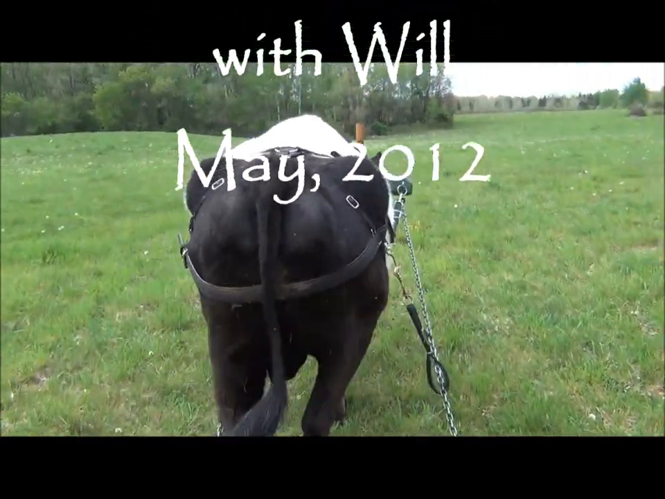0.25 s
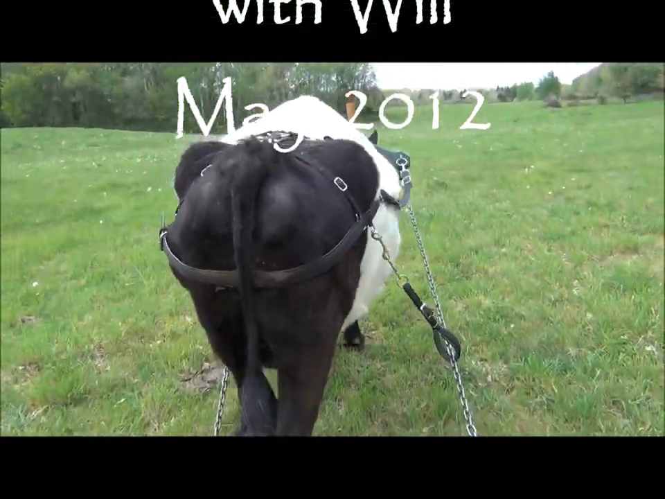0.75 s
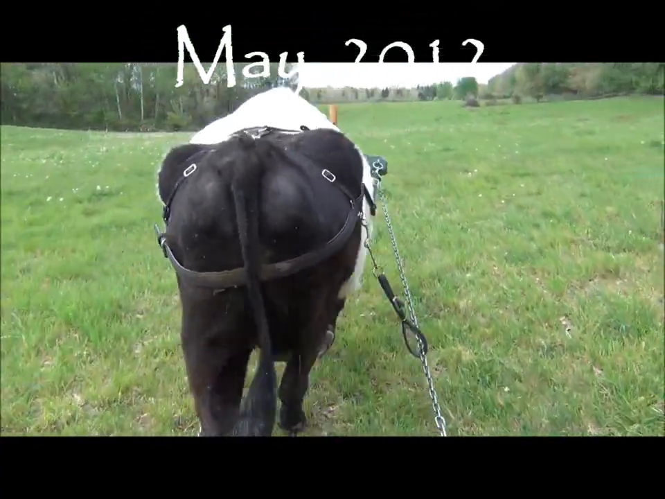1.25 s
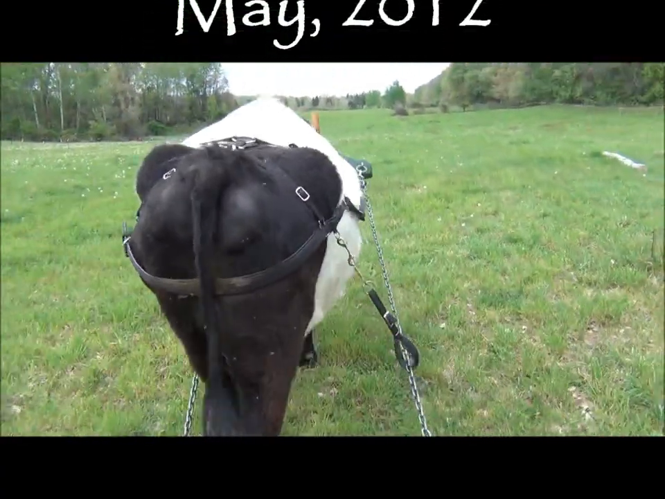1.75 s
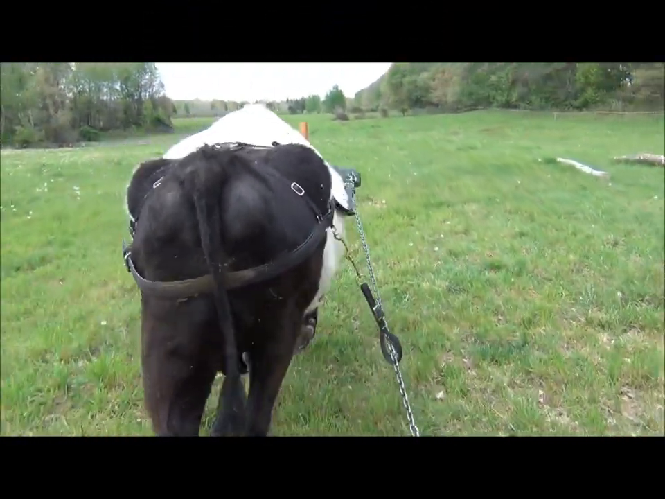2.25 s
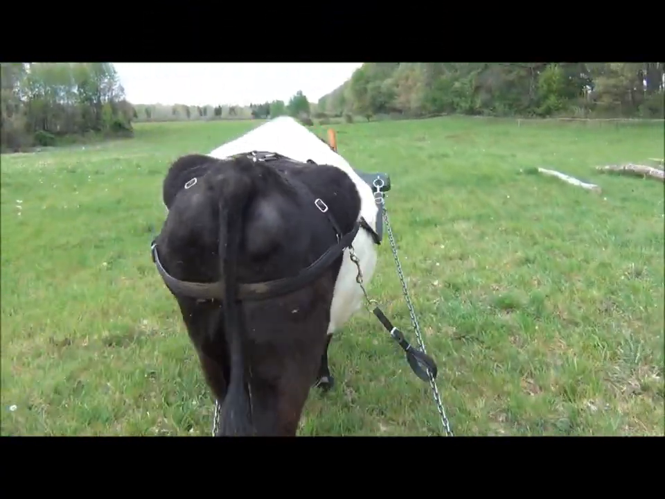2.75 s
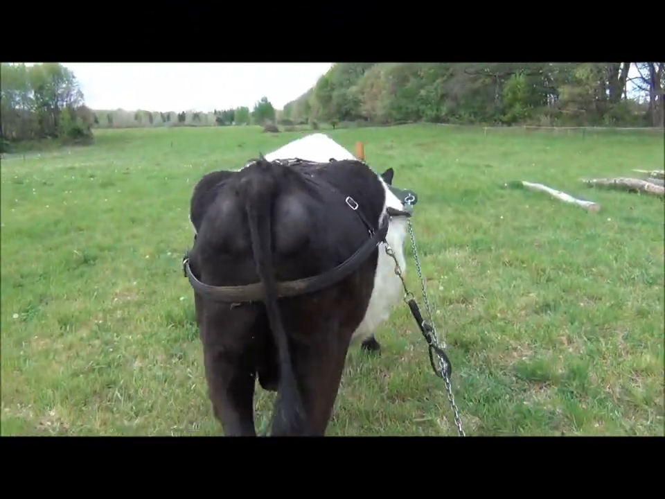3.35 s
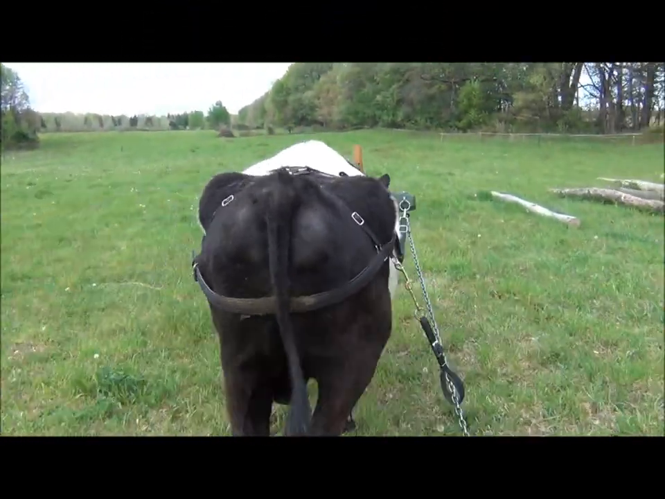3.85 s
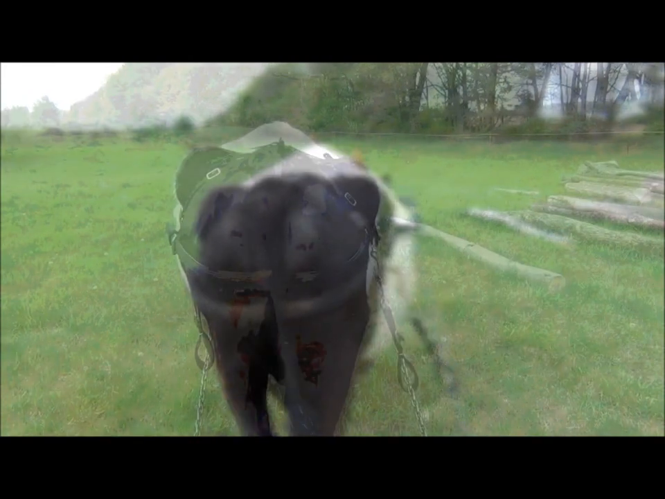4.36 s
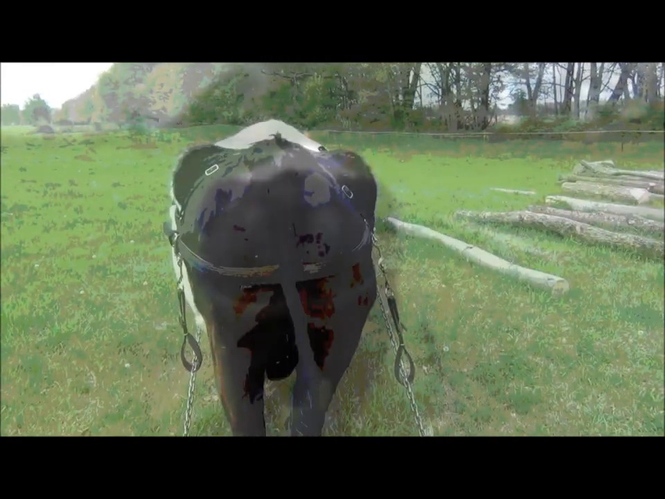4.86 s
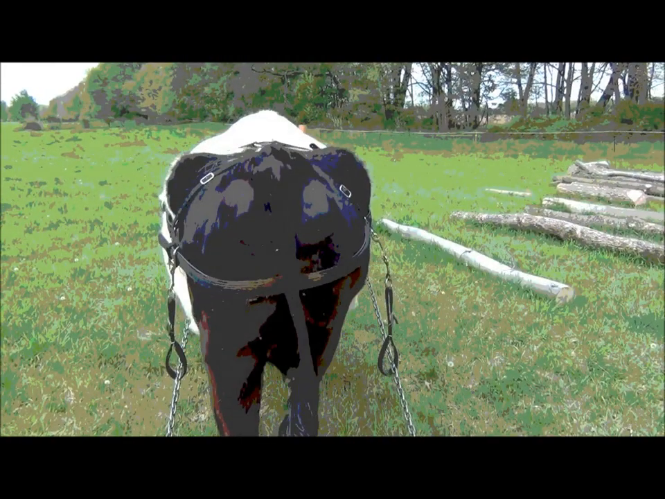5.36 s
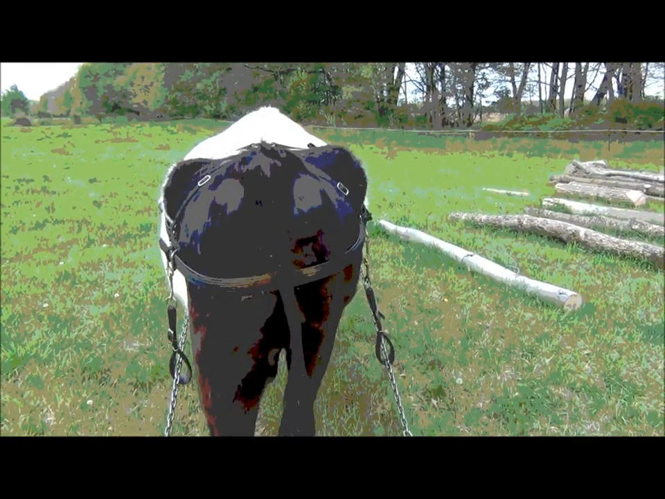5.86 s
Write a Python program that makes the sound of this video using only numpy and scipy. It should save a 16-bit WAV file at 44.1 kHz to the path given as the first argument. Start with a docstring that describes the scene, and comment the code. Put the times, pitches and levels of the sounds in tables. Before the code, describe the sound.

Slow hoof thuds crunch on turf with grassy swishes, close trace chains clinking and jingling sharply, light wind thumping the microphone, then an abrupt cut.

```python
"""An ox in harness walks over a meadow, about two steps a second, heard from close behind.
Each step is a heel and toe thud of crunching turf, then a noise swish as a leg swings through the grass.
Trace chains clink in short dying modes and set a steel ring singing very high; wooden gear clacks in bursts.
The load drags, bumps and jolts behind, dry stalks snap, and a little low wind rumbles and thumps.
A limiter ducks everything at the loudest moments, and the sound is cut off at the end."""
import sys
import numpy as np
from scipy import signal
from scipy.fft import rfft, irfft, next_fast_len
from scipy.io import wavfile
from scipy.ndimage import uniform_filter1d

SR = 44100
rng = np.random.default_rng(int(sys.argv[2]) if len(sys.argv) > 2 else 0)


def wrap_up_sound(samples):
    """Save the sound to the file named by the first command line argument, as 16-bit audio."""
    columns = np.atleast_2d(samples).T
    # keep every value between -1 and 1, then stretch to whole-number steps
    tamed = np.clip(columns, -1, 1)
    steps = np.round(tamed * 32767).astype(np.int16)
    wavfile.write(sys.argv[1], SR, steps)


N = 269892
TIME = np.arange(N) / SR
END_S = 5.484  # the sound is cut here


def amp(db):
    """Decibels to gain."""
    return 10 ** (np.asarray(db) / 20)


def unit(x):
    """Scales to rms 1."""
    return x / np.sqrt(np.mean(x ** 2) + 1e-20)


def add(mix, s, sound):
    """Puts a sound into the mix at time s, in seconds."""
    part = mix[round(s * SR):][:len(sound)]
    part += sound[:len(part)]


def shape(x, points):
    """Filters x by a curve of (Hz, dB) points."""
    hz, db = np.transpose(points)
    size = next_fast_len(len(x))
    f = np.fft.rfftfreq(size, 1 / SR)
    gain = amp(np.interp(np.log(f + 1), np.log(hz), db))
    return irfft(rfft(x, size) * gain, size)[:len(x)]


def colour(x, points):
    """Filters x by a curve of (Hz, dB) points and scales it to rms 1."""
    return unit(shape(x, points))


def focus(x, hz, octaves, depth_db):
    """Lifts a broad hump around hz, at rms 1."""
    f = np.fft.rfftfreq(len(x), 1 / SR) + 1
    hump = np.exp(-(np.log2(f / hz) / octaves) ** 2)
    return unit(irfft(rfft(x) * amp(depth_db * hump), len(x)))


def wander(per_s):
    """A random curve of rms 1, drawn through per_s points a second."""
    return unit(np.interp(TIME * per_s, np.arange(N), rng.standard_normal(N)))


def crackle(per_s, spread_db):
    """Clicks at random moments, uneven in size by spread_db, at rms 1."""
    size = amp(spread_db * np.minimum(rng.exponential(1, N), 4.5))
    happens = rng.random(N) < per_s / SR
    return unit(size * rng.choice([-1, 1], N) * happens)


def ring(modes, scatter_db, detune):
    """Dying modes, each with a random strength, tuning and phase; scaled to start at rms 1."""
    hz, db, t60 = np.transpose(modes)[:, :, None]
    strength, tune, phase = rng.standard_normal((3, len(hz), 1))
    t = np.arange(SR // 2) / SR
    size = amp(db + scatter_db * strength)
    tones = np.sin(2 * np.pi * (hz * (1 + detune * tune) * t + phase))
    waves = size * amp(-60 * t / t60) * tones
    return waves.sum(0) / np.sqrt(np.sum(size ** 2) / 2)


def puff(rise_s, t60):
    """White noise, and apart from it an envelope that swells and dies away."""
    t = np.arange(SR // 2) / SR
    envelope = (1 - np.exp(-t / rise_s)) * amp(-60 * t / t60)
    return rng.standard_normal(len(t)), envelope


def chatter(body, count, within_s):
    """Shares a blow between a first contact and a few weaker ones in quick succession."""
    out = body.copy()
    for delay, strength in rng.random((count, 2)):
        add(out, delay * within_s, body * strength * (1 - delay / 2))
    return out * np.std(body) / np.std(out)


def swing(hz):
    """A damped push of about two cycles, with a peak near 1."""
    cycles = np.arange(SR // 2) / SR * hz
    age = cycles / 0.47
    return age * np.exp(1 - age) * np.sin(2 * np.pi * cycles)


# Spectrum of crunching turf. Each row: frequency in Hz, relative level in dB.
TURF_SPECTRUM = [(40, -3), (140, 0.5), (280, 9), (520, 6), (1000, 3.5), (1700, 2), (3500, -10), (9000, -30)]


def thud(hz, depth_db):
    """A knock at hz, and turf that crunches in separate crumbs under it."""
    soil, blow = puff(rise_s=0.00042, t60=0.16)
    crumbs = crackle(per_s=700, spread_db=2.5)[:len(soil)] + .4 * soil
    crunch = focus(colour(crumbs, TURF_SPECTRUM), hz, octaves=0.42, depth_db=depth_db) * blow
    return unit(crunch) * np.std(blow) + swing(hz)


# The walk. Each row: heel landing in seconds, relative thud level in dB, thud pitch in Hz,
# toe delay after the heel in seconds, leg swish delay after the heel in seconds, swish level in dB.
STEPS = [(0.704, -21, 690, 0.0082, 0.08, -20.5), (1.141, -17, 510, 0.042, .065, -21.5),
         (1.602, -15.5, 520, .006, 0.072, -21.5), (2.074, -19.5, 520, 0.033, 0.076, -32),
         (2.531, -29.5, 480, 0.035, 0.097, -22), (2.985, -15, 480, 0.033, 0.14, -17),
         (3.377, -17.5, 1270, 0.036, 0.23, -26.5), (3.888, -20, 320, .02, 0.2, -26.5),
         (4.289, -15, 300, 0.058, 0.17, -22), (4.834, -18.5, 431, 0.06, 0.082, -23),
         (5.289, -16, 460, .01, .17, -22)]
# The load knocks on the ground. Each row: start in seconds, relative level in dB, pitch in Hz.
LOAD_BUMPS = [(0.406, -28, 720), (1.983, -24.5, 288), (2.753, -22.5, 460.6), (4.373, -17, 520),
              (5.119, -17, 497)]
TOE_DB = -2.5  # the toe lands more softly than the heel


def thuds():
    """Each hoof lands heel first, then toe; the load knocks with a hollower, more pitched note."""
    out = np.zeros(N)
    for s, level_db, hz, toe_s, _, _ in STEPS:
        add(out, s, amp(level_db) * thud(hz, depth_db=4))
        add(out, s + toe_s, amp(level_db + TOE_DB) * thud(hz, depth_db=3.0))
    for s, level_db, hz in LOAD_BUMPS:
        add(out, s, amp(level_db) * thud(hz, depth_db=15.5))
    return amp(-3.5) * out


# Steady hiss of grass under the load. Each row: time in seconds, relative level in dB.
DRAG_LEVEL = [(0.0, -25.5), (0.42, -32), (0.88, -28.5), (1.3, -30), (2.98, -28.5), (3.27, -26),
              (3.89, -29.5), (4.43, -28.5), (5.25, -31.5)]
SWISH_S = 0.042  # half length of a leg's swish


def grass_db():
    """Level of the grass: the steady drag, and one swell in every step as a leg swings through."""
    power = amp(np.interp(TIME, *np.transpose(DRAG_LEVEL)) + 2.5) ** 2
    for s, _, _, _, swing_s, swish_db in STEPS:
        swell = np.exp(-((TIME - s - swing_s) / SWISH_S) ** 2)
        power = power + amp(swish_db) ** 2 * swell
    return 10 * np.log10(power)


# Spectrum of flicking grass blades. Each row: frequency in Hz, relative level in dB.
GRASS_SPECTRUM = [(710, -21), (1200, -10), (1520, -3.5), (1750, -8.5), (3490, -4.5), (5320, -2.5),
                  (6250, -2), (9420, 4), (12700, 4), (15800, -4.5)]
# Spectrum of the scraped ground. Each row: frequency in Hz, relative level in dB.
GROUND_SPECTRUM = [(30, -8.5), (110, -9), (300, -1.5), (550, -4), (900, -7), (1600, -8), (3000, -12.5),
                   (6000, -19.5), (15000, -23)]


def meadow():
    """Blades of grass flick past in clumps; the duller scrape of the ground follows more weakly."""
    swish_db = grass_db()
    blades = colour(crackle(per_s=4400, spread_db=-1.5) + 0.89 * rng.standard_normal(N), GRASS_SPECTRUM)
    clumps_db = 1.38 * wander(per_s=50) + 1.0 * wander(per_s=450)
    swish = blades * amp(swish_db + clumps_db - 0.62)

    crumbs = colour(crackle(per_s=700, spread_db=1.5) + 0.87 * rng.standard_normal(N), GROUND_SPECTRUM)
    ground_db = np.interp(TIME, [0, END_S], [-36, -33])  # the ground grows rougher along the way
    follow_db = 0.074 * (swish_db - swish_db.mean())
    return swish + crumbs * amp(ground_db + follow_db + 2.0 * wander(per_s=47))


# Modes of a chain link. Each row: nominal frequency in Hz, relative level in dB, t60 in seconds.
LINK_MODES = [(1193, -14.5, 0.11), (2915, -14, 0.095), (4510, -11, 0.048), (5283, -5, 0.041),
              (5500, -2.5, 0.046), (6750, -5, 0.015), (6710, -2, 0.047), (7270, 6, 0.0086),
              (7930, -8, 0.065), (10220, 1.5, 0.021)]


def clink(hz):
    """A gritty, chattering contact and a short ring, choked by the neighbouring links."""
    own_mode = (hz, 3, .034)  # the struck link sings out above the rest of the chain
    body = ring([*LINK_MODES, own_mode], scatter_db=3, detune=.022)
    grit, contact = puff(rise_s=.0001, t60=0.042)
    grit = focus(grit, hz, octaves=0.32, depth_db=4.5) * contact
    return chatter(body, count=3, within_s=.006) + .4 * grit


# Chain links strike each other. Each row: start in seconds, level in dB, nominal pitch of the link in Hz.
CLINKS = [(0.053, -15.5, 7100), (0.2061, -12, 6750), (0.2362, -16, 6680), (0.2648, -13.5, 6600),
          (0.2753, -17.5, 6700), (0.3534, -16.5, 7540), (0.4115, -14, 6800), (0.6743, -16.5, 6600),
          (0.6864, -20, 6470), (0.7044, -8.5, 5500), (0.9634, -14, 7100), (1.068, -14.5, 6900),
          (1.2072, -14.5, 5400), (1.3592, -15, 6770), (1.6926, -15, 5270), (1.8592, -12.5, 7150),
          (1.9475, -16.5, 6900), (1.9965, -10.5, 6700), (2.013, -9, 6700), (2.056, -16, 6720),
          (2.152, -14, 6700), (2.18, -20, 5440), (2.761, -14, 7200), (3.0021, -14.5, 6740),
          (3.029, -20, 5260), (3.6481, -18, 5570), (3.6805, -13.5, 5590), (3.711, -13, 6860),
          (3.7379, -15, 5370), (4.1165, -12, 6950), (4.14, -16.5, 5300), (4.2806, -15.5, 7500),
          (4.3887, -14, 5200), (4.6719, -8, 5280), (4.8455, -15.5, 6710), (5.0698, -16, 6860),
          (5.2883, -13.5, 7150), (5.34, -11.5, 5120), (5.369, -15, 5120)]
# A hook swings against the chain. Each row: start in seconds, level in dB.
HOOK_HITS = [(4.982, -11.5)]
# Modes of the hook. Each row: frequency in Hz, relative level in dB, t60 in seconds.
HOOK_MODES = [(5060, -7.5, 0.13), (7670, -8, 0.053), (9280, 0, 0.038)]


def chains():
    """Links clink as the trace chains tighten and slacken; a hook swings against the chain."""
    out = np.zeros(N)
    for s, level_db, hz in CLINKS:
        add(out, s, amp(level_db) * clink(hz))
    hook = ring(HOOK_MODES, scatter_db=0, detune=0)
    for s, level_db in HOOK_HITS:
        add(out, s, amp(level_db) * hook)
    return out


# A steel ring is thrown. Each row: start in seconds, first blow's level in dB, bouncing time in seconds.
JINGLES = [(0.1835, -20, .005), (0.2139, -21, .05), (0.2761, -11, .13), (0.4945, -12.5, .008),
           (0.6893, -24, .03), (0.9707, -18, .004), (1.071, -19, .012), (1.1129, -19, .008),
           (1.1618, -26, .008), (1.208, -22.5, .07), (1.3925, -19.5, .005), (1.7489, -26, .003),
           (1.9505, -20.5, .008), (1.9969, -18.5, .01), (2.0178, -12.5, .045), (2.1006, -17, .008),
           (2.169, -14.5, .06), (3.03, -24, .08), (3.6506, -28, .09), (3.7504, -16, .004),
           (3.78, -22, .025), (4.144, -15, .03), (4.672, -9.5, .022), (4.9107, -26, .045),
           (5.0779, -21, .018), (5.3722, -24, .01), (5.4091, -25, .025)]
# Modes of the steel ring. Each row: nominal frequency in Hz, relative level in dB, t60 in seconds.
RING_MODES = [(14250, 3, .24), (14341, -0.5, .14), (14734, 2, .11), (14900, 2, .02), (15170, -4, .27),
              (15402, -2, .17)]
BOUNCE_S, BOUNCE_DB = 0.013, -1  # mean gap between bounces, their level against the first blow
CHOKE_S = 0.008  # time constant with which a new bounce stops the note before it
REST_S = .1  # the ring comes to rest against the leather, which damps its last note
FLUTTER_DB = 1.3  # rms flutter of the level as the ring turns


def jingles():
    """A steel ring bounces unevenly; each bounce chokes the last note and favours modes of its own."""
    out, t = np.zeros(N), np.arange(SR // 2) / SR
    songs = [ring(RING_MODES, scatter_db=5, detune=.0016) for _ in range(24)]
    for s, level_db, rattle_s in JINGLES:
        gaps = BOUNCE_S * rng.uniform(.3, 1.7, size=18)
        delays = np.cumsum(gaps) - gaps
        picks = rng.integers(len(songs), size=len(gaps))
        for delay, gap, pick in zip(delays, gaps, picks):
            last = delay + gap > rattle_s
            if last:
                choke = np.exp(-(t / REST_S) ** 2)
            else:
                choke = np.exp(-np.maximum(t - gap, 0) / CHOKE_S)
            bounce_db = BOUNCE_DB if delay else 0
            add(out, s + delay, amp(level_db + bounce_db) * choke * songs[pick])
            if last:
                break
    return out * amp(FLUTTER_DB * wander(per_s=130))


SLACK_DB, SHAKEN_DB = -40, -42  # level of the ticks at rest, and what each clink adds around it
SHAKE_S = 0.036  # half length of the shaking around a clink


def slack_links():
    """Loose links tick at random, harder while the chain shakes; no two links are quite alike."""
    shakes = sum(np.exp(-((TIME - s) / SHAKE_S) ** 2) for s, *_ in CLINKS)
    shaking = amp(SLACK_DB) + amp(SHAKEN_DB) * shakes
    links = [ring(LINK_MODES, scatter_db=3, detune=.035) for _ in range(6)]
    out = np.zeros(N)
    for link in links:
        blows = shaking * crackle(per_s=27, spread_db=3.0)
        out += signal.oaconvolve(blows, link / np.linalg.norm(link))[:N]
    return out / np.sqrt(len(links))


# The wooden gear clacks. Each row: start in seconds, relative level in dB.
CLACKS = [(0.587, -22.5), (0.614, -19.5), (0.633, -20.5), (1.478, -21), (1.490, -19), (1.504, -20),
          (1.52, -16.5), (2.435, -19), (2.45, -22)]
# Modes of the wood. Each row: nominal frequency in Hz, relative level in dB, t60 in seconds.
WOOD_MODES = [(1080, 0, .028), (1400, -4, .016), (1880, -3, .028), (3050, -4, .016), (3450, -1, .018)]


def clacks():
    """Loose wooden gear knocks, scrapes and chatters, never twice on quite the same spot."""
    out = np.zeros(N)
    for s, level_db in CLACKS:
        grit, contact = puff(rise_s=.001, t60=.07)
        grit = colour(grit, [(300, -20), (900, 0), (3700, -5), (6000, -30)]) * contact
        knock = chatter(ring(WOOD_MODES, scatter_db=2, detune=.045), count=5, within_s=.012)
        add(out, s, amp(level_db) * (.7 * knock + .5 * grit))
    return out


# Dry stalks snap. Each row: start in seconds, relative level in dB, favoured pitch in Hz, t60 in seconds.
SNAPS = [(0.7632, -7, 2230, 0.0074), (0.7993, -16.5, 9300, 0.015), (0.9346, -20.5, 3300, 0.024),
         (1.823, -22, 3000, 0.027), (3.1195, -4.5, 12800, 0.0096), (3.615, -22, 1900, 0.13),
         (4.4603, -11, 1810, 0.017)]


def stalks():
    """A few dry stalks break loudly, and many small ones tick at random, as short bursts of noise."""
    fibres, crack = puff(rise_s=.0001, t60=0.0075)
    ticks = signal.oaconvolve(crackle(per_s=35, spread_db=0.5), fibres * crack)[:N]
    out = amp(-41.5) * unit(ticks)
    for s, level_db, hz, t60 in SNAPS:
        fibres, crack = puff(rise_s=.0001, t60=t60)
        add(out, s, amp(level_db + 4.0) * focus(fibres, hz, octaves=1.6, depth_db=7.5) * crack)
    return out


# The load's hollow note on small clods. Each row: frequency in Hz, relative level in dB, t60 in seconds.
CLOD_MODES = [(290, 0, .06), (380, -1, .04), (520, -4, .03)]


def clods():
    """The load jolts over small clods at random, each setting off its hollow note."""
    note = ring(CLOD_MODES, scatter_db=0, detune=0)
    jolts = signal.oaconvolve(crackle(per_s=30, spread_db=2), note)[:N]
    return amp(-44.5) * unit(jolts)


# The rumble of the wind. Each row: time in seconds, level in dB.
WIND_LEVEL = [(0, -49.5), (1.1, -51.5), (1.9, -40), (2.3, -68), (2.95, -37), (3.9, -48.5), (4.7, -34.5),
              (5.48, -44)]
# Gusts land on the microphone. Each row: start in seconds, level in dB, pitch in Hz.
BUFFETS = [(1.905, -27, 75), (3.439, -22, 130), (3.491, -18, 178), (4.249, -24.5, 105), (4.478, -17, 60),
           (4.652, -16, 105), (4.657, -16, 272), (4.759, -19.5, 93)]


def wind():
    """Lumpy rumble of low noise, and single dull thumps where a gust lands."""
    air = colour(rng.standard_normal(N), [(10, -18.0), (60, -5.5), (130, -12.0), (260, -18.5), (4000, -78.5)])
    lumps_db = 2.2 * wander(per_s=18)
    out = air * amp(np.interp(TIME, *np.transpose(WIND_LEVEL)) + lumps_db)
    for s, level_db, hz in BUFFETS:
        add(out, s, amp(level_db) * swing(hz))
    return out


# Side level against mid at each frequency: wide bass and treble, almost mono around 2 to 5 kHz.
# Each row: frequency in Hz, side over mid in dB.
SIDE_LEVEL = [(40, -7.5), (130, -9), (260, -30.5), (1000, -14), (2200, -74), (5200, -64), (9000, -12),
              (15000, -17)]


def scene():
    """Everything is close by in the open, with no echo; the sound shifts slightly from side to side."""
    mid = meadow() + chains() + slack_links() + jingles() + thuds() + stalks() + clacks() + clods() + wind()
    side = shape(mid, SIDE_LEVEL) * wander(per_s=920)
    return np.array([mid + side, mid - side])


def record(dry):
    """A quick limiter ducks loud moments and rounds off spikes; then the cut and the band limit."""
    power = uniform_filter1d((dry ** 2).mean(0), size=64)
    power_db = 10 * np.log10(abs(power) + 1e-12)
    limit_db, recovery_db_per_s = -13.5, 130
    fall = TIME * recovery_db_per_s
    held_db = np.maximum.accumulate(power_db + fall) - fall  # jumps up at once, sinks steadily
    over_db = np.maximum(held_db - limit_db, 0)
    limited = dry / amp(uniform_filter1d(over_db, size=32))
    rounded = limited / (1 + (limited / .56) ** 6) ** (1 / 6)
    # a drop of 12 dB, then a fall of 900 dB a second
    cut = np.where(TIME < END_S, 1, amp(-12 - 900 * np.maximum(TIME - END_S, 0)))
    edge_hz = 15850  # treble above this is removed
    lowpass = signal.firwin(511, edge_hz, window=("kaiser", 9), fs=SR)
    return signal.oaconvolve(rounded * cut, lowpass[None], "same")


dry = scene()
out = record(dry)
wrap_up_sound(out)
```